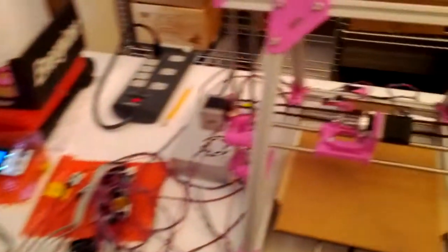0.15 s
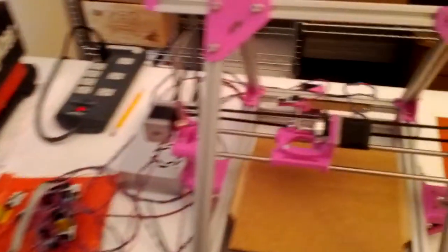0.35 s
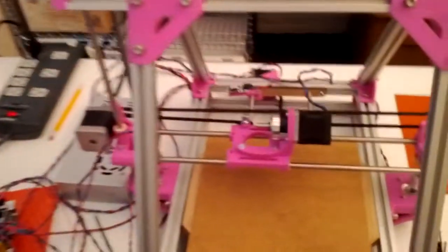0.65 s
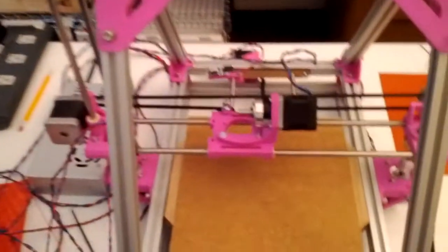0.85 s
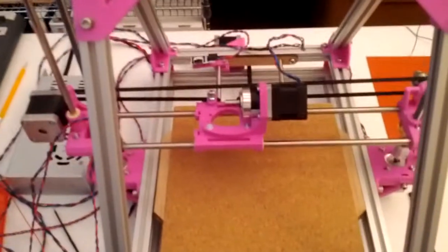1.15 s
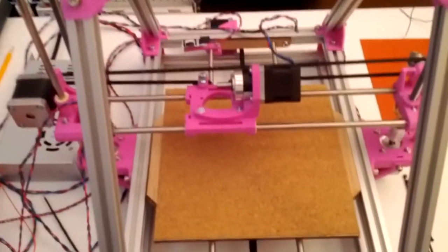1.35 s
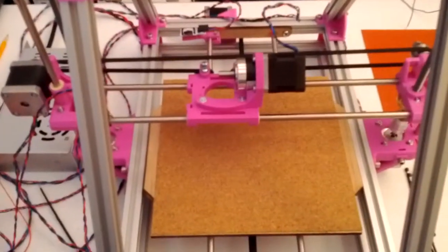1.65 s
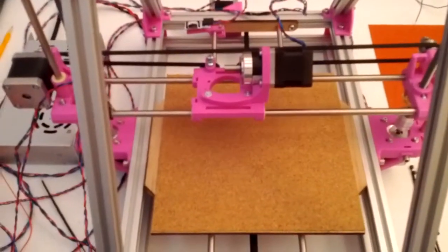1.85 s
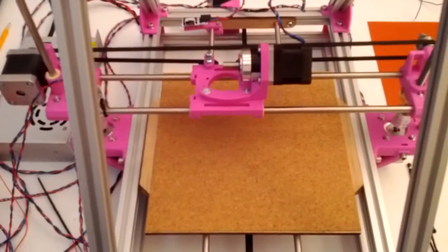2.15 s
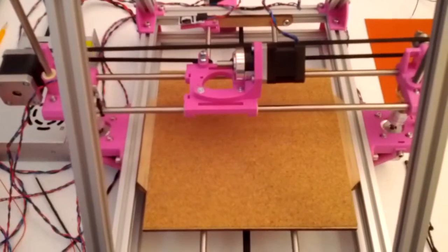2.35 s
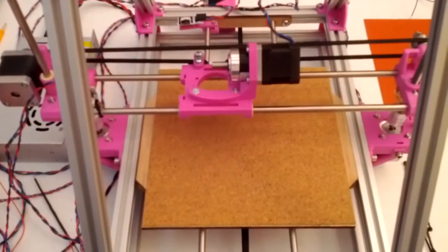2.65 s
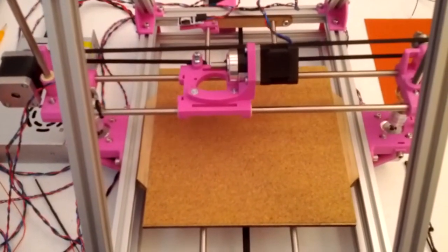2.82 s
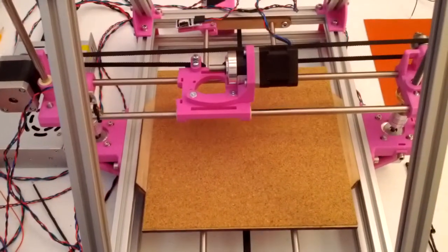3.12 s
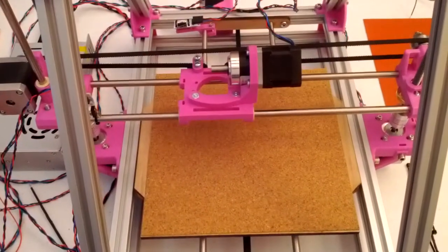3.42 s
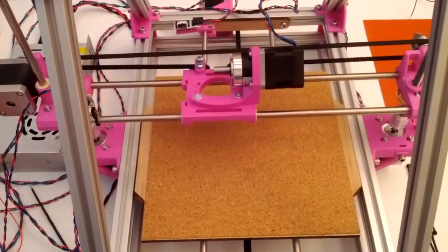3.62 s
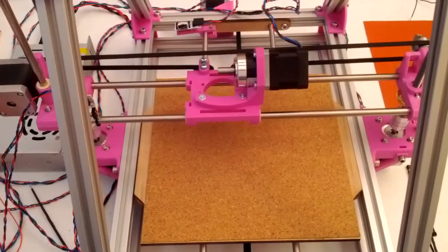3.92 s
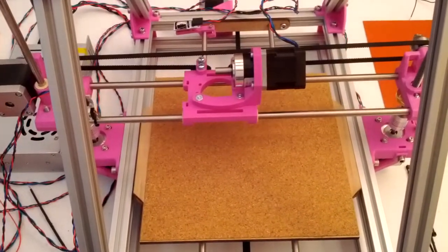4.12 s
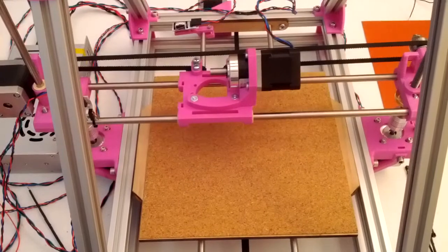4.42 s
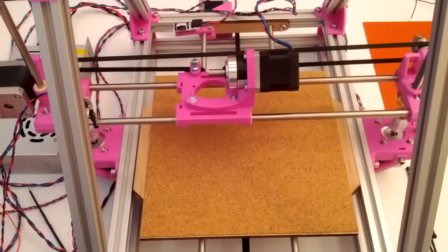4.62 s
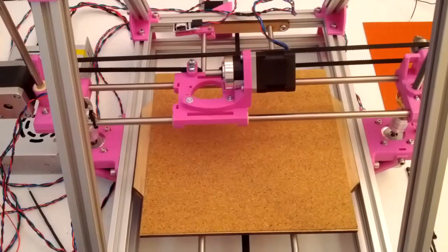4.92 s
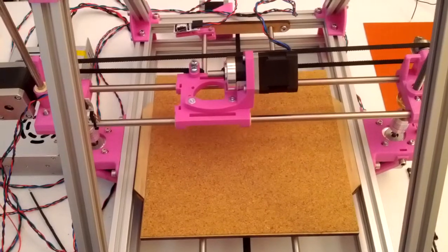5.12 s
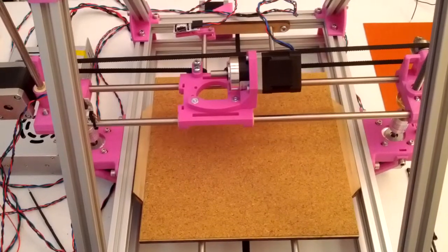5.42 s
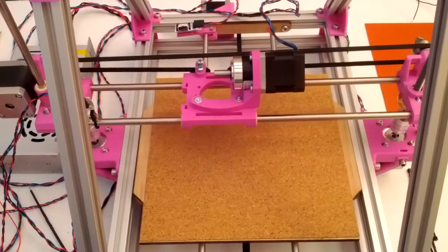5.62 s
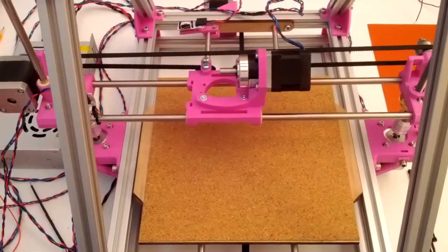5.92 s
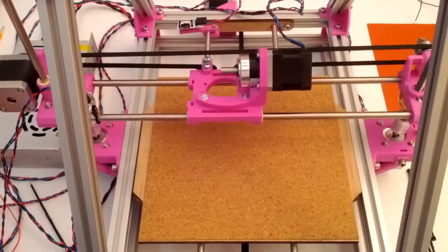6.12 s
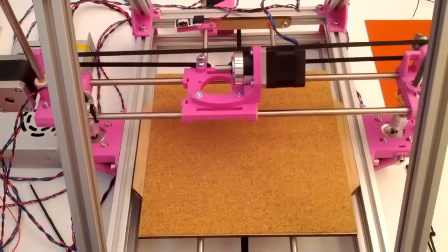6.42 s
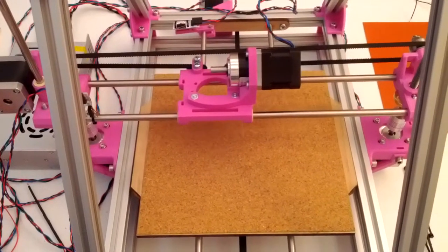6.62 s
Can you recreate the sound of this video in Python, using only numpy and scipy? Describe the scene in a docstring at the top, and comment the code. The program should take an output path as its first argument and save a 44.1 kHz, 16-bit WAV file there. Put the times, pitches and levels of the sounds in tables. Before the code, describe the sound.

Stepper motors whine and hum close by while a desktop 3D printer moves, with short knocks at each reversal and a faint hiss.

```python
"""The hum and whine of a small 3D printer, close to the microphone in a small room, on diagonal strokes.
Its stepper motors hum at the full-step rate and whine at the microstep rate; their chopper drivers hiss.
At each corner one motor speeds up briefly, then the motion reverses with a knock. The bearings roll and
rattle, and a rustle passes once. The microphone starts off to one side and comes round to the front."""
import sys
import numpy as np
from scipy import signal
from scipy.fft import rfft, irfft, next_fast_len
from scipy.io import wavfile

SR = 44100
rng = np.random.default_rng(int(sys.argv[2]) if len(sys.argv) > 2 else 0)


def wrap_up_sound(samples):
    """Save the sound to the file named by the first command line argument, as 16-bit audio."""
    columns = np.atleast_2d(samples).T
    # keep every value between -1 and 1, then stretch to whole-number steps
    tamed = np.clip(columns, -1, 1)
    steps = np.round(tamed * 32767).astype(np.int16)
    wavfile.write(sys.argv[1], SR, steps)


N = 298109
T = np.arange(N) / SR
MICROSTEP_HZ, MICROSTEPS = 2030.1, 16   # cruising rate; microsteps to a full step
CORNER_S, APPROACH_S = 0.087, 1.33
AT_SIDE = np.clip(1 - T / APPROACH_S, 0, 1)   # microphone position: 1 at the side, 0 in front
SIDE_WHINE_DB, SIDE_UPPER_DB, SIDE_BUZZ_DB, SIDE_ROLLING_DB = 3.5, -11.5, -5.0, -1   # side against front

# corners of the path: (start [s], reversing motor [0 carriage, 1 bed], jolt [dB], steel tick [dB],
# hum's octave on the next stroke [dB], microstep whine on the next stroke [dB])
CORNERS = [(0.019, 0, -47, -60, -58.5, -57.5), (0.627, 1, -44, -45, -49.5, -55),
           (1.319, 0, -33.5, -49, -54, -55.5), (2.090, 1, -40.5, -45, -48.5, -55.5),
           (2.945, 0, -45, -57, -49, -57.6), (3.886, 1, -44, -43.5, -50, -56),
           (4.908, 0, -34.5, -56, -48, -58.5), (6.014, 1, -43, -35, -57.5, -56)]
# modes of the plastic carriage: (frequency [Hz], relative level [dB], t60 [s])
CARRIAGE_MODES = [(676, -10.5, 0.031), (764, -10, 0.02), (983, -4.5, 0.021), (1227, -5, 0.021),
                  (1365, -5, 0.018), (1726, -15.5, 0.025)]
# spectrum of the drivers' hiss, also the colour of the snaps: (frequency [Hz], relative density [dB])
HISS_SPECTRUM = [(5000, -34), (7500, -10), (9000, -2), (10200, 5), (11500, 1), (12800, -3.5), (15500, -15)]


def from_db(db):
    """Decibels to gain."""
    return 10 ** (np.asarray(db) / 20)


def rms_one(x):
    """Scale to rms 1."""
    return x / np.sqrt(np.mean(x ** 2) + 1e-20)


def drift(hz):
    """Random wander of rms 1, mostly slower than the given rate."""
    hop, settle = 40, 2000
    pole = np.exp(-2 * np.pi * hz * hop / SR)
    white = rng.standard_normal(N // hop + settle + 2)
    slow = signal.lfilter([1], [1, -2 * pole, pole * pole], white)[settle:]
    return np.interp(np.arange(N) / hop, np.arange(len(slow)), rms_one(slow))


def noise(spectrum):
    """Noise of rms 1, coloured by rows of (frequency [Hz], relative density [dB])."""
    hz, level_db = np.transpose(spectrum)
    size = next_fast_len(N)
    bins = np.maximum(np.arange(size // 2 + 1) * SR / size, 1)
    gain = from_db(np.interp(np.log(bins), np.log(hz), level_db, left=-60))
    return rms_one(irfft(rfft(rng.standard_normal(size)) * gain, size)[:N])


def tone(phase, waver_db):
    """A sine of rms near 1 whose strength wavers a little."""
    return np.sqrt(2) * np.sin(phase + rng.uniform(0, 2 * np.pi)) * from_db(waver_db * drift(16.2))


def ring(clicks, hz, t60):
    """A unit click sets a decaying sine of height 1 ringing."""
    r, w = np.exp(-np.log(1000) / (t60 * SR)), 2 * np.pi * hz / SR
    return signal.lfilter([0, np.sin(w)], [1, -2 * r * np.cos(w), r * r], clicks + 1e-18)


def strike(at, level_db, modes, spread_db):
    """Blows at the given samples ring every mode, each with a strength of its own."""
    out, chance = np.zeros(N), rng.standard_normal((len(at), len(modes)))
    for k, (hz, db, t60) in enumerate(modes):
        clicks = np.zeros(N)
        clicks[at] = from_db(level_db + db + spread_db * chance[:, k])
        out += (-1) ** k * ring(clicks, hz, t60)
    return out


def motion():
    """Relative speed, each motor's cornering (0-1), seconds since the bed reversed, and diagonal (+-1)."""
    # step rate through a corner: (progress [0-1], rate [times cruising])
    corner_speed = [(0, 1), (.05, 1.414), (.42, 1.414), (.6, 1.1), (.8, .65), (1, 1)]
    speed, turning, since_bed, diagonal = np.ones(N), np.zeros((2, N)), np.ones(N), np.ones(N)
    for start, motor, *_ in CORNERS:
        progress, end = (T - start) / CORNER_S, start + CORNER_S
        speed *= np.interp(progress, *np.transpose(corner_speed))
        turning[round(motor)] += np.interp(progress, [0, .07, .85, 1.05], [0, 1, 1, 0])
        since_bed = np.where((T > end) & (round(motor) == 1), T - end, since_bed)
        diagonal *= np.interp(progress, [.5, 1], [1, -1])
    return speed, turning, since_bed, diagonal


def strokes():
    """Seconds into the stroke, and the levels of the hum's octave and the whine, held between corners."""
    age, levels_db = T, np.array([[-53.0], [-60.0]])
    for start, _, _, _, octave_db, whine_db in CORNERS:
        age = np.where(T > start + CORNER_S / 2, T - start - CORNER_S, age)
        blend = np.clip(2 * (T - start) / CORNER_S - 1, 0, 1)
        levels_db = levels_db + (np.array([[octave_db], [whine_db]]) - levels_db) * blend
    return age, *levels_db


def by_diagonal(diagonal, after_carriage, after_bed):
    """The motors' vibrations add up one way after a carriage corner (-1), another after a bed one (+1)."""
    return np.interp(diagonal, [-1, 1], [after_carriage, after_bed])


def room(x, t60=0.53):
    """Diffuse reflections of the small room, duller than the direct sound."""
    t = T[:SR // 2]
    tail = rng.standard_normal(len(t)) * np.exp(-np.log(1000) * t / t60) * (t > .003)
    tail = signal.sosfilt(signal.butter(1, 5000, fs=SR, output="sos"), tail / np.sqrt(np.sum(tail ** 2)))
    return signal.fftconvolve(x, tail)[:N]


def rolling(carriage_turning, since_bed):
    """The bearings roll with a low rush, louder in carriage corners and just after the bed reverses."""
    # rolling noise: (frequency [Hz], relative density [dB])
    spectrum = [(25, 5.5), (70, 1.5), (150, 7.5), (320, -0.5), (600, -1), (1020, -4), (1320, -5),
                (1600, -9), (2200, -4), (2800, -10.5), (5200, -13), (8000, -14.5), (15000, -11.5)]
    swell_db = 2.9 * carriage_turning + 2 * np.exp(-since_bed / 0.38)
    return from_db(-59.0 + 1.07 * drift(33) + SIDE_ROLLING_DB * AT_SIDE + swell_db) * noise(spectrum)


def drivers(beat_hz=20.75):
    """The current choppers hiss, and spit where their two rates beat together."""
    # colour of the spitting: (frequency [Hz], relative density [dB])
    spit_spectrum = [(8000, -18), (10000, -17), (11300, 8), (12300, -7), (15000, -5)]
    # spitting at the crest of the beat: (time [s], level [dB])
    spit_levels = [(0, -59), (.15, -52), (.45, -55), (.9, -64), (6.76, -61)]
    beat = (.5 + .5 * np.cos(2 * np.pi * beat_hz * (T - .15) + 0.99 * drift(3.1))) ** 4
    spit_db = np.interp(T, *np.transpose(spit_levels)) + 3.4 * drift(15)
    spit = from_db(spit_db) * beat * noise(spit_spectrum)
    return from_db(-62.0 + 0.4 * drift(74)) * noise(HISS_SPECTRUM) + spit


def snaps(decay_s=0.0029):
    """Tiny bright snaps that die within a few milliseconds."""
    # faint snaps: (time [s], level [dB])
    onsets = [(0.436, -50), (2.99, -49), (4.27, -47), (5.55, -48)]
    envelope = sum(from_db(db) * (T >= s) * np.exp(-np.abs(T - s) / decay_s) for s, db in onsets)
    return envelope * noise(HISS_SPECTRUM)


def rustle(peak_s=1.514, attack_s=0.005, decay_s=0.06):
    """A brief rustle that swells quickly and dies away."""
    # colour of the rustle: (frequency [Hz], relative density [dB])
    spectrum = [(600, -16), (1500, 8), (2300, 9), (4000, 3), (7000, -3.5), (13000, 2), (16000, -13)]
    after = T - peak_s
    envelope = np.exp(np.minimum(after, 0) / attack_s - np.maximum(after, 0) / decay_s)
    return from_db(-49.0 + 2 * drift(150)) * envelope * noise(spectrum)


def frame_sway(attack_s=0.033, decay_s=0.067):
    """Each reversal shakes the frame, which booms briefly, lower when the bed turns."""
    out = np.zeros(N)
    for motor, (hz, level_db) in enumerate([(225, -50.0), (153, -48.5)]):
        ends = [start + CORNER_S for start, which, *_ in CORNERS if round(which) == motor]
        shake = sum(np.exp(-np.maximum(T - end, 0) / decay_s - np.maximum(end - .015 - T, 0) / attack_s)
                    for end in ends)
        boom = rms_one(np.gradient(ring(rng.standard_normal(N), hz, t60=0.032)))
        out += from_db(level_db) * shake * boom
    return out


def rattle(since_bed, base_per_s=70, busiest_s=0.24, spread_s=0.34, clumping=0.5):
    """Bearing balls click in little clusters, most busily in the half second after the bed reverses."""
    busy = .08 + np.exp(-((since_bed - busiest_s) / spread_s) ** 2)
    clumps = np.exp(clumping * drift(25) - clumping ** 2 / 2)
    at = np.flatnonzero(rng.random(N) < base_per_s * busy * clumps / SR)
    return strike(at, -51 + 2 * rng.standard_normal(len(at)), CARRIAGE_MODES, spread_db=2.5)


def knock(times_s, carriage_db, rods_db):
    """Blows that ring both the plastic carriage and the steel rods."""
    # modes of the rods: (frequency [Hz], relative level [dB], t60 [s])
    rod_modes = [(2300, -5, 0.014), (2920, -16.5, 0.07), (3420, -3.5, 0.011), (4110, -8, 0.015),
                 (5080, -13.5, 0.022), (6500, -10, 0.0073), (6780, -13, 0.016)]
    at = np.round(times_s * SR).astype(int)
    plastic = strike(at, carriage_db, CARRIAGE_MODES, spread_db=1)
    return plastic + strike(at, rods_db, rod_modes, spread_db=1)


def corner_knocks(thud_db=-33.5):
    """Slack jolts as a motor speeds up, steel ticks as it reverses; on its own turns the heavy bed thuds."""
    start, motor, jolt_db, tick_db, *_ = np.transpose(CORNERS)
    jolts = knock(start + 0.003, jolt_db, jolt_db - 12)
    ticks = knock(start + 0.065, tick_db - 6, tick_db)
    thuds = knock(start[motor > .5] + 0.074, thud_db, thud_db - 12)
    return jolts + ticks + thuds


def clacks():
    """Now and then a bearing clacks, ringing the carriage more than the rods."""
    # loudest blows of the bearings: (time [s], level [dB])
    blows = [(0.742, -42), (1.023, -41.5), (2.204, -39.5), (2.454, -41), (4.124, -43), (4.933, -37.5),
             (6.204, -34.5), (6.362, -39.5)]
    times_s, level_db = np.transpose(blows)
    return knock(times_s, level_db, level_db - 16.5)


def cornering(speed, turning, hold_hz=11000):
    """One motor sings alone and roughens as it brakes; the halted bed motor whistles on holding current."""
    # harmonics 1 to 3 of a motor running alone: (carriage motor [dB], bed motor [dB])
    harmonics = [(-63, -74), (-84, -70), (-84, -70)]
    carriage, bed = turning
    braking = np.clip((1.414 - speed) / .25, 0, 1)
    rate_hz = MICROSTEP_HZ * speed * (1 + (.007 + .14 * braking) * drift(260))
    micro = 2 * np.pi * np.cumsum(rate_hz) / SR
    solo = np.zeros(N)
    for k, (carriage_db, bed_db) in enumerate(harmonics, 1):
        gain = carriage * from_db(carriage_db) + bed * from_db(bed_db)
        solo += gain * tone(k * micro, waver_db=0.5) / (1 + (k - 1) ** 2 * braking)
    solo *= from_db(-0.5 + 4.3 * braking * drift(120)) * (1 + 0.73 * braking)
    scrape = carriage * braking * from_db(-65.5 + 2.3 * drift(150))
    scrape *= noise([(700, -11), (1600, 3.5), (2400, 2), (4500, -9.5), (7000, -28)])
    growl = from_db(-59.5) * (carriage + bed) * tone(micro / MICROSTEPS, waver_db=2)
    whistle = tone(2 * np.pi * hold_hz * T + .4 * drift(60), waver_db=1.5)
    whistle *= from_db(-59 + SIDE_UPPER_DB * AT_SIDE) * carriage * np.clip(speed, 0, 1) ** 4
    return solo + scrape + growl + whistle


def hum(cruise, diagonal, octave_db, throb_hz=5.1, ring_s=0.027):
    """Torque ripple at the full-step rate throbs and shakes the frame, which rings on into each corner."""
    # lines of the buzzing frame: (frequency [times the full-step rate], relative level [dB])
    buzz_lines = [(.75, -8.5), (1.5, -21), (1.75, -8), (2.627, -5.5), (3, -9.5), (4, -9), (5.254, -8.5),
                  (5.515, -9.5), (6, -7), (6.875, -15), (7, -4.5), (7.36, -25), (8, -1), (9, -6.5),
                  (9.5, -14.5), (10, -4.5), (12, -15.5), (13, -16.5), (18, -45), (34.627, -17)]
    step = 2 * np.pi * MICROSTEP_HZ / MICROSTEPS * T
    pole = np.exp(-1 / (ring_s * SR))
    ringing = 1 - signal.lfilter([1 - pole], [1, -pole], 1 - cruise)
    throb = 1 + by_diagonal(diagonal, 0.11, 0.27) * np.cos(2 * np.pi * throb_hz * T + drift(1))
    low = from_db(by_diagonal(diagonal, -54, -58.5)) * throb * tone(step + 0.29 * drift(2.7), waver_db=0.2)
    low += from_db(octave_db) * tone(2 * step + 0.1 * drift(12), waver_db=0)
    buzz = sum(from_db(db) * tone(k * step + 0.18 * drift(3.2), waver_db=2.5) for k, db in buzz_lines)
    buzz *= from_db(by_diagonal(diagonal, -61.5, -61.0) + SIDE_BUZZ_DB * AT_SIDE)
    return low * (0.32 + 0.61 * ringing) + buzz * (0.35 + 0.49 * ringing)


def whine(cruise, diagonal, age, whine_db, limp_hz=333.3):
    """Microsteps are uneven over each coil cycle of four full steps, so their upper lines flutter."""
    # harmonics 3 to 7 of the microstep rate:
    # (relative level [dB], phase swing [rad], lift after a bed corner and cut after a carriage one [dB])
    upper_lines = [(0.3, .25, -.3), (-1.7, .5, 2.0), (2.2, 1.45, .3), (-2, 2.0, 0), (-6, 2.1, 0)]
    # a tone at half the microstep rate, strongest in the first second: (time [s], level [dB])
    half_rate = [(0.1, -62.5), (0.35, -58.5), (0.6, -57), (0.8, -58.5), (0.95, -79.5)]
    micro = 2 * np.pi * MICROSTEP_HZ * T
    coil = micro / MICROSTEPS / 4
    limp = 2 * np.pi * limp_hz * T   # step timing limps in a short repeating pattern, adding side tones
    lower = from_db(whine_db + SIDE_WHINE_DB * AT_SIDE) * tone(micro, waver_db=0.9)
    lower += from_db(-80.5 - 7.2 * diagonal) * tone(micro - limp, waver_db=2)
    lower += from_db(np.interp(T, *np.transpose(half_rate))) * tone(micro / 2, waver_db=1)
    octave_db = by_diagonal(diagonal, -64.5, -69.5) + by_diagonal(diagonal, -6, 3.5) * age - 2.1 * AT_SIDE
    flutter = 1 - by_diagonal(diagonal, 0.52, 0.3) * np.cos(coil)
    octave = from_db(octave_db) * tone(2 * micro + .3 * np.sin(coil), waver_db=.5) * flutter
    upper = np.zeros(N)
    for k, (db, swing, lift_db) in enumerate(upper_lines, 3):
        phase = k * (micro + 0.13 * np.sin(limp)) + swing * np.sin(coil)
        upper += from_db(db + lift_db * diagonal) * tone(phase, waver_db=1.3)
    upper *= from_db(-68.5 + SIDE_UPPER_DB * AT_SIDE) * (1 + 0.17 * np.cos(coil) + 0.23 * np.cos(2 * coil))
    return cruise * (lower + octave + upper)


def scene():
    """The printer from close by, the same in both channels; only the blows ring the room."""
    speed, turning, since_bed, diagonal = motion()
    age, octave_db, whine_db = strokes()
    cruise = np.clip(1 - turning.sum(axis=0), 0, 1)
    motors = hum(cruise, diagonal, octave_db) + whine(cruise, diagonal, age, whine_db)
    motors += cornering(speed, turning)
    blows = corner_knocks() + clacks() + rattle(since_bed)
    mechanics = rolling(turning[0], since_bed) + frame_sway() + blows + from_db(-5.0) * room(blows)
    mono = motors + mechanics + rustle() + drivers() + snaps()
    return np.stack([mono, mono])


def record(dry, cutoff_hz=15800):
    """The highest treble is cut steeply."""
    return signal.sosfilt(signal.ellip(12, .1, 70, cutoff_hz, fs=SR, output="sos"), dry)


dry = scene()
out = record(dry)
wrap_up_sound(out)
```